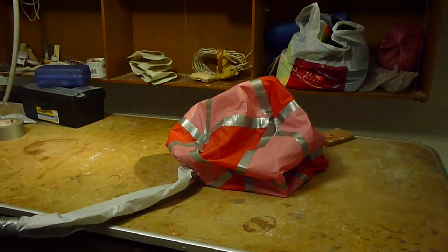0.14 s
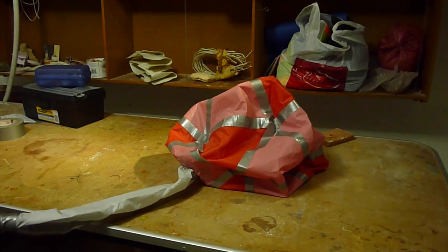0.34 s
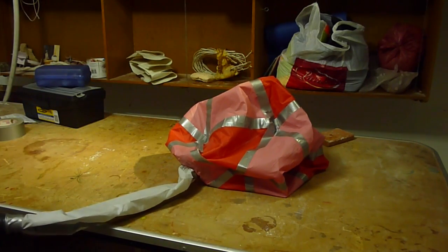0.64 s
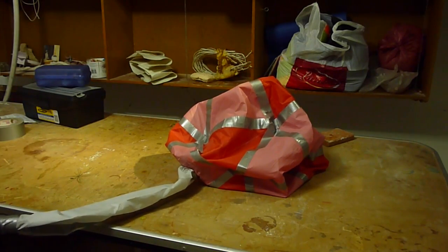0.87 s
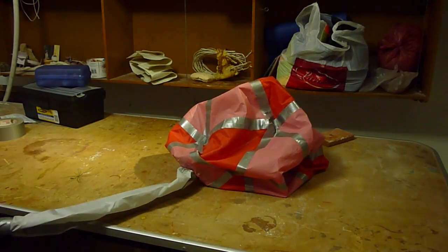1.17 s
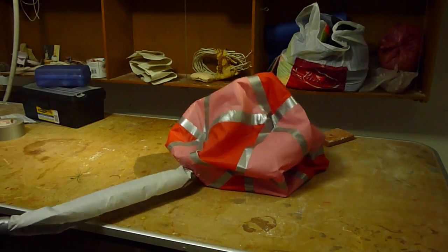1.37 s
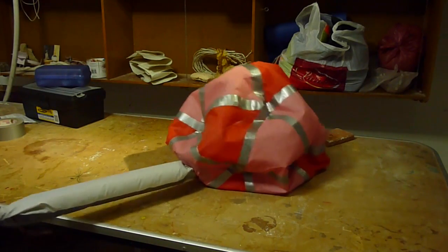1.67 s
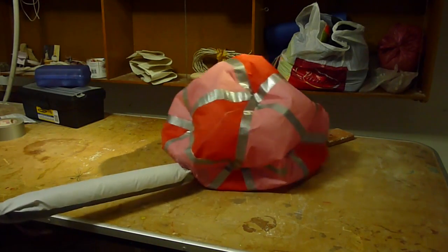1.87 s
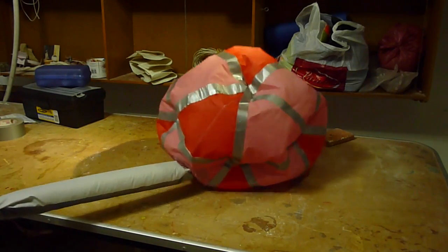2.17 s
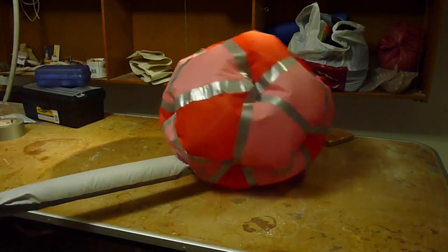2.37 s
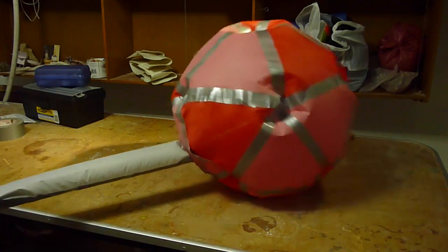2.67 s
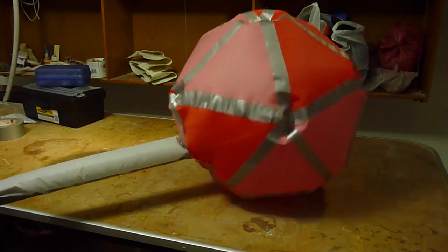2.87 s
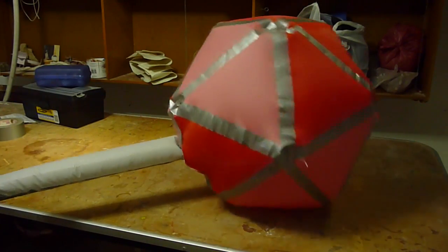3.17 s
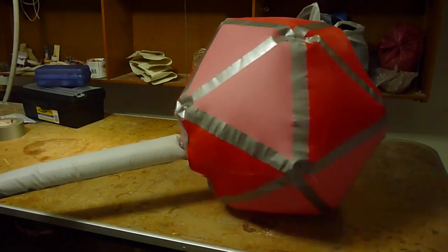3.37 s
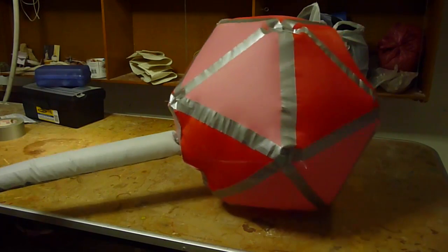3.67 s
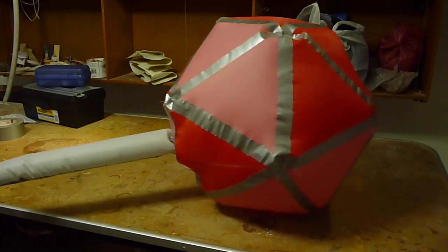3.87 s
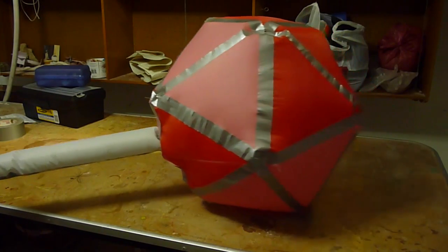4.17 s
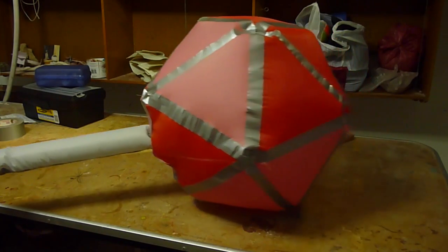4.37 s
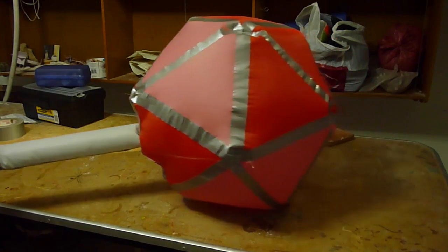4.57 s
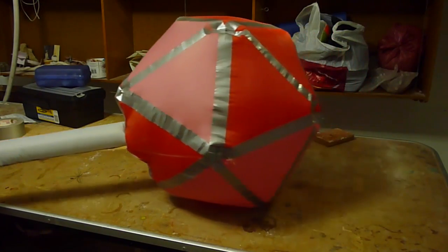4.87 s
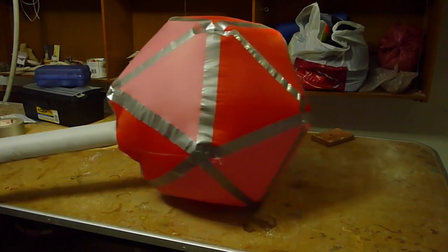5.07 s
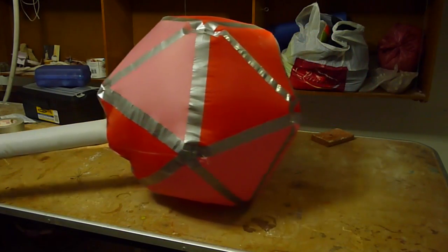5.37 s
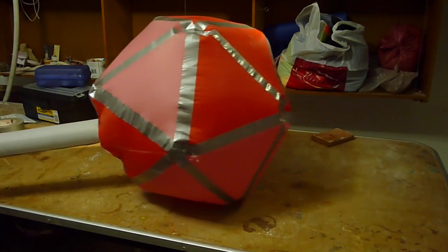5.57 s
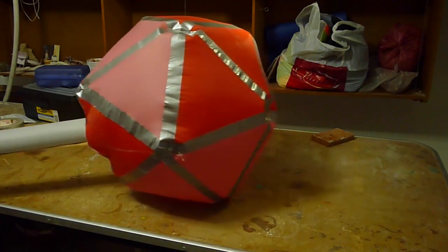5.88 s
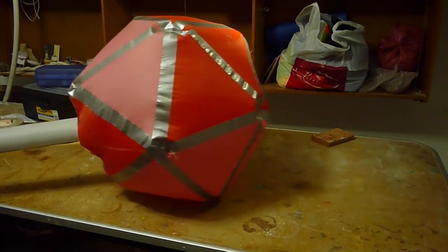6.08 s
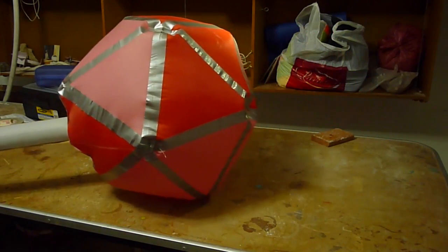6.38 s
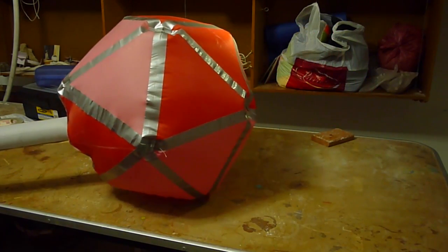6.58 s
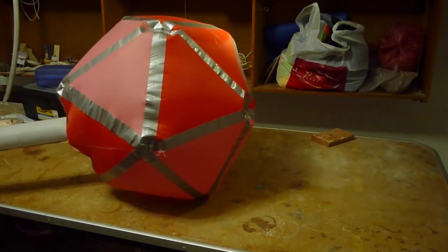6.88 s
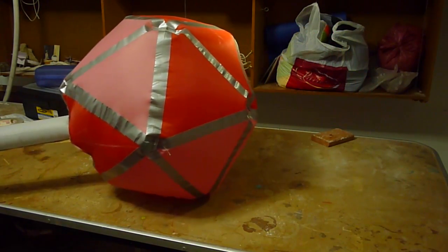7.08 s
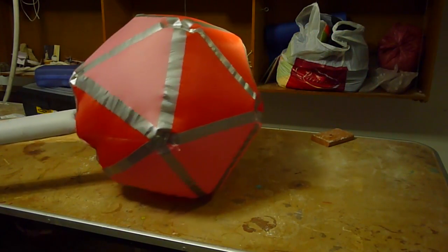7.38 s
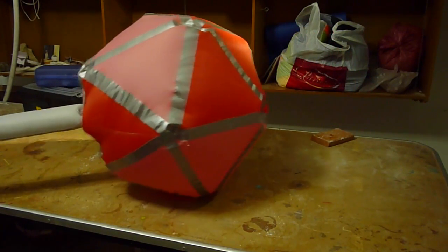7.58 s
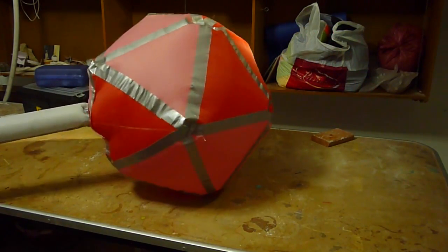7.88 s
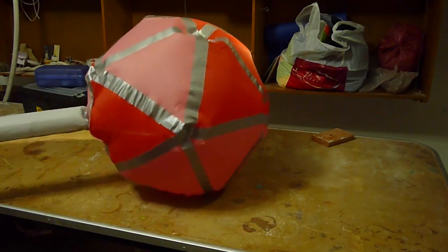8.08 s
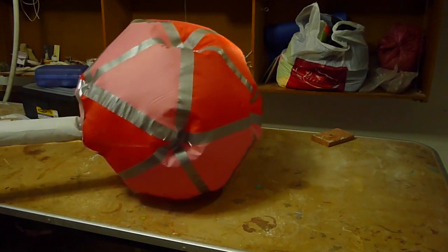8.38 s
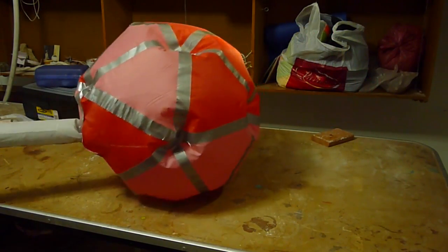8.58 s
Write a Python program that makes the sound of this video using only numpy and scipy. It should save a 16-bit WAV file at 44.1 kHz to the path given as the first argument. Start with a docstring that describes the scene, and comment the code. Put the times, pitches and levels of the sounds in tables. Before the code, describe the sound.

After a second of faint room noise, an electric blower clicks on, revs up into a humming whine with rushing air, finally rising in pitch.

```python
"""A small mains-driven blower is switched on in a quiet workshop and fills a plastic bag ball. Its motor buzzes
at twice the mains rate, while whining tones follow the rotor speed over rushing air. Pulses ring the housing,
sine waves make the whine and shaped noise makes the air and the still room. Near the end the housing is knocked
and rings, and as the load drops the rotor speeds up. A compact recorder notches the sound and adds a mirrored
copy of it in the treble."""
import sys
import numpy as np
from scipy import signal
from scipy.fft import rfft, irfft, next_fast_len
from scipy.io import wavfile
from scipy.ndimage import uniform_filter1d

SR = 44100
rng = np.random.default_rng(int(sys.argv[2]) if len(sys.argv) > 2 else 0)


def wav_record(signal):
    """Record a signal, one row per channel, as 16-bit PCM in the file named by sys.argv[1]."""
    frames = np.transpose(np.atleast_2d(signal))
    bounded = np.clip(frames, -1, 1)
    # unit amplitude maps onto the largest positive 16-bit level
    quanta = np.round(bounded * 32767).astype(np.int16)
    wavfile.write(sys.argv[1], SR, quanta)


N = 385434
T = np.arange(N) / SR   # time of each sample in seconds

# Tone colour of the still room. Each row: frequency in Hz, relative level in dB per Hz.
ROOM_SPECTRUM = [(20, -19), (45, -16), (100, -9.5), (172, -2.5), (300, -10), (600, -14), (1000, -15.5),
                 (2000, -21.5), (3000, -24.5), (4500, -28.5), (5700, -26.5), (7000, -32.5), (8000, -35.5)]
# Faint treble swells in the room. Each row: middle in seconds, level in dB.
TREBLE_SWELLS = [(.12, -66), (.25, -67), (.49, -70), (.72, -64), (.93, -68)]
ROOM_DB = -53
SWELL_HZ, SWELL_SPREAD_S = 5640, .04

# The switch contacts. Each row: start in seconds, level of the noise snap in dB.
SWITCH_SNAP = [(1.153, -13)]
MAINS_BEAT_HZ = 120   # twice the mains rate

# Ringing of the blower housing. Each row: pitch in Hz, width in Hz, relative level in dB.
HOUSING_RINGS = [(122, 16, -14), (260, 51, -1.5), (345, 70, 3.5), (518, 35, 1), (730, 220, -2),
                 (960, 230, 1.5)]
# Air and motor levels before the echo. Each row: time in seconds, then the levels of rumble, roar,
# rush and mains buzz in dB.
AIR_AND_BUZZ_LEVELS = [(1.17, -39, -37, -47.5, -19), (1.23, -49, -31.5, -54.5, -22.5),
                       (1.38, -33, -34, -44, -34), (1.5, -36.5, -33.5, -43, -32),
                       (1.65, -33.5, -35.5, -40.5, -32), (1.9, -38.5, -37.5, -42, -33.5),
                       (2.2, -43, -43.5, -45.5, -37.5), (2.6, -40.5, -41.5, -43.5, -36.5),
                       (3.1, -39, -40.5, -42, -33), (3.9, -41, -40.5, -42.5, -40),
                       (5.0, -45.5, -40.5, -42.5, -40), (5.6, -42.5, -39.5, -43, -39.5),
                       (7.9, -43, -39.5, -43.5, -40.5), (8.1, -52, -41, -42, -45),
                       (8.7, -65, -42, -44.5, -49)]
# Tone colours of the moving air. Each row: frequency in Hz, relative level in dB per Hz.
RUMBLE_SPECTRUM = [(30, -32), (70, -24.5), (95, -16), (120, -3.5), (170, 2.5), (200, -5.5), (240, -1),
                   (400, -47)]
ROAR_SPECTRUM = [(150, -35), (240, -3.5), (350, 4.5), (440, -3), (520, 1), (700, -0.5), (850, 0), (1050, 1),
                 (1300, -1), (1800, -11.5), (2500, -35.5)]
RUSH_SPECTRUM = [(500, -37.5), (1000, 7), (2000, 8.5), (2600, 10.5), (3100, 8), (3350, 8.5), (3570, 12.5),
                 (3750, 3), (4400, 1), (5300, 0.5), (5500, 2), (5800, -0.5), (6500, -0.5), (8000, -10)]

# The rotor gains speed with a quick and a slow lag, and speeds up again once the load drops.
SPIN_UP_S, FULL_SPEED_HZ = 1.2015, 291.75   # start in seconds, turns per second
QUICK_SHARE, QUICK_LAG_S, SLOW_LAG_S = .35, .1152, .3737
UNLOAD_S, UNLOAD_GAIN_HZ, UNLOAD_LAG_S = 7.974, 54.2, .6
RUN_UP_HISS_HZ, RUN_UP_HISS_WIDTH_HZ, RUN_UP_HISS_DB = 2300, 650, -33
HUM_DB, HUM_FROM_S, HUM_SAG_DB_PER_S, HUM_END_S = -23.5, 1.21, 14.0, 1.57

# Rotor orders: tones at whole multiples of the rotor speed. Each row: multiple, level at full speed
# in dB, extra level at half speed in dB, extra level without load in dB.
ROTOR_ORDERS = [(1, -21.5, -5.5, -1), (2, -28, -2, -1), (3, -41, 16.5, 7.5), (4, -40, 0, 5),
                (5, -54.5, 11, 5), (6, -38.5, 12, 2), (8, -53, 4, -6), (12, -39, 18, 4),
                (13, -55.5, 1.5, 1), (14, -56, 1.5, -3), (16, -61.5, 1, -4), (18, -48.5, -8, 10),
                (22, -59.5, 1.5, 1), (23, -57.5, 1.5, 1), (24, -57.5, -1, 5)]
# Passing fades and swells of single orders. Each row: multiple, middle in seconds,
# half length in seconds, change in dB.
ORDER_FADES = [(1, 1.5, 0.033, -20), (1, 1.653, .08, -10.5), (1, 2.4, 0.045, -1), (1, 8.0, 0.034, -20),
               (1, 8.205, 0.019, -16), (1, 8.27, 0.039, -6.5), (2, 1.41, .04, -20), (2, 1.9, 0.03, -15),
               (2, 1.94, 0.022, -10), (2, 2.18, .15, -6.5), (2, 5.2, 0.68, -1), (2, 7.8, 0.077, -6),
               (2, 8.06, .045, -9), (2, 8.22, 0.021, -3), (2, 8.72, 0.19, -5), (3, 1.53, 0.06, -18),
               (3, 1.8, 0.024, -10), (3, 2.22, 0.061, -16), (3, 3.3, 0.27, 2.5), (3, 5.9, 1.1, -11.5),
               (3, 8.04, 0.04, -10), (3, 8.38, 0.095, -11), (3, 8.66, .02, -8), (4, 2.3, 0.18, -6),
               (4, 3.55, .22, -16), (4, 5.5, 1.3, -3.5), (4, 7.4, .15, 3.5), (4, 7.95, 0.14, -12),
               (4, 8.6, .15, -6), (6, 1.33, .05, -12), (6, 6.23, .8, -23), (6, 8.4, 0.056, -6),
               (12, 1.353, 0.12, -34), (12, 1.68, 0.024, -10), (12, 2.1, 0.027, -10), (12, 2.02, 0.03, 5),
               (12, 2.26, 0.17, -9), (12, 2.75, 0.072, 1.5), (12, 3.49, 0.16, -12.5), (12, 5.02, 0.25, -16),
               (12, 6.06, 0.14, -12), (12, 8.2, .04, 1), (12, 8.33, 0.024, -8), (12, 8.47, 0.026, -8),
               (12, 8.62, 0.023, -7), (18, 2.1, 0.5, -16), (18, 4.3, 0.33, -11), (18, 5.43, .1, -10),
               (18, 6.9, .3, -4), (18, 7.7, .25, -13), (18, 8.19, 0.027, -8), (18, 8.3, .04, 5.5),
               (18, 8.7, 0.18, -10)]
# Side tones from torque pulses. Each row: rotor multiple, mains beat multiple, level in dB.
TORQUE_SIDEBANDS = [(2, -1, -58), (2, 1, -45.5), (8, 2, -53), (8, 3, -47)]
WHINE_FROM_S = 1.3
FADE_EDGE = 3   # steepness of the edges of a fade (2 = bell)

# Housing knocks. Each row: start in seconds, pitch in Hz, level in dB, seconds to fall by 60 dB.
HOUSING_JOLTS = [(7.952, 262, -19.5, 0.16), (8.008, 279, -18.5, 0.16), (8.076, 240, -26, 0.28)]

# Middles of the recorder's notch filters. Each entry: frequency in Hz.
NOTCH_MIDDLES = [1400, 1599, 2150, 8000]
# Widths of the same notches, in the same order. Each entry: width in Hz.
NOTCH_WIDTHS = [660, 610, 276, 1620]
RECORDER_RATE_HZ, CUTOFF_HZ = 16000, 11700
# thin tone of the recorder's electronics, added after the notches and before the low-pass filters
CLOCK_HZ, CLOCK_DB = 7917, -79.5
OFFSET = 0.01   # constant shift from the converter


def amp(db):
    """Turn a level in dB into a gain."""
    return 10 ** (np.asarray(db) / 20)


def in_time(rows):
    """Draw straight lines between the rows, giving each column sample by sample."""
    s, *columns = np.transpose(rows)
    return [np.interp(T, s, column) for column in columns]


def coloured(spectrum, ref_hz):
    """Noise with the given spectrum, scaled so that the part inside the band ref_hz has rms 1."""
    size = next_fast_len(N)
    hz = np.fft.rfftfreq(size, 1 / SR)
    point_hz, point_db = np.array(spectrum).T
    spectrum_db = np.interp(np.log(hz + 1), np.log(point_hz), point_db)
    bins = rfft(rng.standard_normal(size)) * amp(spectrum_db)
    inside = (hz > ref_hz[0]) & (hz < ref_hz[1])
    band_sum = np.sqrt(2 * np.sum(np.abs(bins[inside]) ** 2))
    return irfft(bins, size)[:N] * size / band_sum


def drift(rate_hz):
    """Slow random wandering with spread 1: smoothed noise drawn at every 20th sample."""
    r = np.exp(-2 * np.pi * rate_hz * 20 / SR)
    draws = rng.standard_normal(N // 20 + 2002)
    slow = signal.lfilter([1], [1, -2 * r, r * r], draws)[2000:]   # skip the filter's start
    return np.interp(np.arange(N) / 20, np.arange(len(slow)), slow / slow.std())


def resonance(x, hz, width_hz):
    """Two-pole filter that passes a band around hz, with gain 1 on top."""
    r = np.exp(-np.pi * width_hz / SR)
    feed = np.array([1, 0, -1]) * (1 - r * r) / 2
    back = [1, -(1 + r * r) * np.cos(2 * np.pi * hz / SR), r * r]
    return signal.lfilter(feed, back, x)


def lag(start_s, lag_s):
    """Rise from 0 at start_s towards 1, fast at first and then ever slower."""
    return 1 - np.exp(-np.maximum(T - start_s, 0) / lag_s)


def room():
    """The still room is soft coloured noise, with a few faint swells of a narrow treble band."""
    still = amp(ROOM_DB + 1.2 * drift(3)) * coloured(ROOM_SPECTRUM, ref_hz=(100, 1000))
    swells = sum(amp(db) * np.exp(-.5 * ((T - s) / SWELL_SPREAD_S) ** 2) for s, db in TREBLE_SWELLS)
    narrow = resonance(rng.standard_normal(N), SWELL_HZ, width_hz=360)
    return still + swells * narrow / narrow.std()


def switch(snap_s, tail_s, tail_db):
    """The contacts give a bright snap of noise, with a short tail from the walls."""
    s, snap_db = SWITCH_SNAP[0]
    after = np.maximum(T - s, 0)
    shape = np.exp(-after / snap_s) + amp(tail_db) * np.exp(-after / tail_s)
    high_pass = signal.butter(2, 2000, "high", fs=SR, output="sos")
    bright = signal.sosfilt(high_pass, rng.standard_normal(N))
    return amp(snap_db) * shape * bright * (T >= s)


def buzz(buzz_db, jitter_s, uneven_db, rattle):
    """Each current peak jerks the armature; the housing rings, and loose parts rattle along."""
    at = np.arange(SWITCH_SNAP[0][0], N / SR - .01, 1 / MAINS_BEAT_HZ)
    chance = rng.standard_normal((len(at), 2))
    late_s = np.abs(jitter_s * chance[:, 0])
    jerk_db = uneven_db * np.clip(chance[:, 1], -2, 1.3)
    # the rattle is steady noise, with the jerks set on top as single-sample pulses
    jerks = rattle * rng.standard_normal(N) / np.sqrt(SR / MAINS_BEAT_HZ)
    jerks[((at + late_s) * SR).astype(int)] += amp(jerk_db)
    rung = np.zeros(N)
    for k, (hz, width_hz, db) in enumerate(HOUSING_RINGS):
        sign = (-1) ** k   # neighbouring rings push opposite ways
        rung += sign * amp(db) * resonance(jerks, hz, width_hz) / np.sqrt(width_hz)
    return amp(buzz_db) * rung / rung.std()


def air(angle, rumble_db, roar_db, rush_db, beat_depth, turn_depth, patchy_db):
    """Turbulent air is noise: rumble, roar and a bright rush throbbing with mains beat and rotor."""
    mains_throb = beat_depth * np.cos(2 * np.pi * MAINS_BEAT_HZ * T)
    rotor_throb = turn_depth * np.cos(2 * angle)   # twice a turn
    rumble = amp(rumble_db + patchy_db * drift(6)) * coloured(RUMBLE_SPECTRUM, ref_hz=(90, 230))
    roar = amp(roar_db + patchy_db * drift(8)) * coloured(ROAR_SPECTRUM, ref_hz=(640, 820))
    rush = amp(rush_db + patchy_db * drift(10)) * coloured(RUSH_SPECTRUM, ref_hz=(3900, 5000))
    return rumble + roar + (1 + mains_throb + rotor_throb) * rush


def rotor_speed():
    """Turns per second: two lags lead up to full speed, and a third follows the drop in load."""
    quick = QUICK_SHARE * lag(SPIN_UP_S, QUICK_LAG_S)
    slow = (1 - QUICK_SHARE) * lag(SPIN_UP_S, SLOW_LAG_S)
    return FULL_SPEED_HZ * (quick + slow) + UNLOAD_GAIN_HZ * lag(UNLOAD_S, UNLOAD_LAG_S)


def run_up_hiss(turns_hz):
    """A band of hiss swells while the rotor gains speed and is gone at full speed."""
    share = np.clip(turns_hz / FULL_SPEED_HZ, 0, 1)
    band = resonance(rng.standard_normal(N), RUN_UP_HISS_HZ, RUN_UP_HISS_WIDTH_HZ)
    return amp(RUN_UP_HISS_DB) * np.sin(np.pi * share ** 2) * band / band.std()


def hum(waver, broken_db):
    """The starting current makes the housing sing on the third harmonic of the mains beat."""
    sagging_db = HUM_DB - HUM_SAG_DB_PER_S * (T - HUM_FROM_S)
    level = amp(sagging_db + broken_db * np.clip(drift(11), -3, 1))
    level *= lag(HUM_FROM_S, 0.017) * np.clip((HUM_END_S - T) / 0.063, 0, 1)
    phase = 2 * np.pi * 3 * MAINS_BEAT_HZ * T + waver * drift(8.7)
    return np.sqrt(2) * level * np.sin(phase)


def order_levels(turns_hz, onset_s):
    """Each rotor order's level follows the slip below full speed, the load and its own fades."""
    slip = 2 * np.clip(1 - turns_hz / FULL_SPEED_HZ, 0, 1)   # 1 at half speed
    unloaded = lag(UNLOAD_S, onset_s)
    for k, db, slow_db, free_db in ROTOR_ORDERS:
        level_db = db + slow_db * slip + free_db * unloaded
        for faded_order, s, half_s, change_db in ORDER_FADES:
            if round(faded_order) == round(k):
                level_db += change_db * np.exp(-.5 * np.abs((T - s) / half_s) ** FADE_EDGE)
        yield k, 0, level_db   # 0: no mains beat in the pitch


def whine(turns_hz, angle, wobble, flutter_db, sweep_db):
    """Rotor orders are sines, high ones fluttering most; torque pulses add tones beside them."""
    shaky = angle + wobble * drift(10)   # speed is never quite even; high orders blur most
    beat = 2 * np.pi * MAINS_BEAT_HZ * T
    glide = uniform_filter1d(np.abs(np.gradient(turns_hz)) * SR, size=4000)   # Hz per second
    lines = list(order_levels(turns_hz, onset_s=0.034)) + list(TORQUE_SIDEBANDS)
    out = np.zeros(N)
    for k, m, db in lines:
        k, m = np.round(k), np.round(m)
        broken_db = sweep_db * np.tanh(k * glide / 400)   # a gliding tone crosses room peaks and dips
        depth_db = flutter_db * np.sqrt(k) + broken_db
        level = amp(db + depth_db * np.clip(drift(18.0), -3, 1))
        out += level * np.sin(k * shaky + m * beat + 2 * np.pi * rng.random())
    return np.sqrt(2) * out * np.clip((T - WHINE_FROM_S) / 0.091, 0, 1)


def jolts():
    """The housing is knocked near the end: sines with a soft onset that ring and die away."""
    out = np.zeros(N)
    for s, hz, level_db, t60_s in HOUSING_JOLTS:
        after = np.maximum(T - s, 0)
        shape = amp(level_db - 60 * after / t60_s) * (1 - np.exp(-after / .004))
        out += shape * np.sin(2 * np.pi * hz * after)
    return out


def workshop(x, t60_s, wet_db):
    """Walls add a tail of decaying noise to the direct sound: a fixed comb of peaks and dips."""
    s = np.arange(SR // 2) / SR
    tail = rng.standard_normal(len(s)) * amp(-60 * s / t60_s)
    response = amp(wet_db) * tail / np.sqrt(np.sum(tail ** 2))
    response[0] = 1   # the direct sound
    return signal.fftconvolve(x, response / np.sqrt(np.sum(response ** 2)))[:N]


def scene():
    """The blower from the switch onward, over the still room; only its noises get the echo."""
    turns_hz = rotor_speed()
    angle = 2 * np.pi * np.cumsum(turns_hz) / SR
    rumble_db, roar_db, rush_db, buzz_db = in_time(AIR_AND_BUZZ_LEVELS)
    running = np.clip((T - SWITCH_SNAP[0][0]) / 0.0043, 0, 1)
    noise = buzz(buzz_db, jitter_s=.0008, uneven_db=7.5, rattle=2.2)
    noise += air(angle, rumble_db, roar_db, rush_db, beat_depth=0.091, turn_depth=0.13, patchy_db=0.6)
    noise += run_up_hiss(turns_hz)
    tones = hum(waver=0.51, broken_db=2.5)
    tones += whine(turns_hz, angle, wobble=0.0061, flutter_db=.5, sweep_db=2.4)
    blower = running * tones + workshop(running * noise, t60_s=.4, wet_db=-7)
    snap = switch(snap_s=0.0017, tail_s=0.023, tail_db=-13)
    return (room() + snap + blower + jolts())[None]


def record(dry):
    """Notch filters, a low sample rate whose mirror image leaks through, a top cut and an offset."""
    x = dry
    for hz, width_hz in zip(NOTCH_MIDDLES, NOTCH_WIDTHS):
        x = x - resonance(x, hz, width_hz)
    x = x + amp(CLOCK_DB) * np.sqrt(2) * np.sin(2 * np.pi * CLOCK_HZ * T)
    below_half_rate = signal.ellip(12, .1, 70, RECORDER_RATE_HZ / 2 - 40, fs=SR, output="sos")
    x = signal.sosfilt(below_half_rate, x)
    x = x * (1 + 2 * np.cos(2 * np.pi * RECORDER_RATE_HZ * T))   # image mirrored about half the rate
    x = signal.sosfilt(signal.butter(10, 8100, fs=SR, output="sos"), x)   # softens the image
    top_cut = signal.cheby2(16, 60, CUTOFF_HZ, fs=SR, output="sos")
    return signal.sosfilt(top_cut, x) + OFFSET


dry = scene()
out = record(dry)
wav_record(out)
```